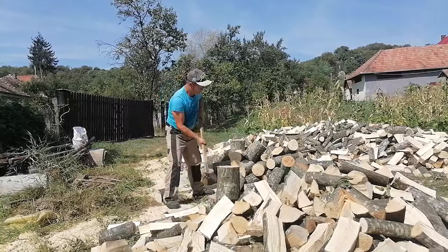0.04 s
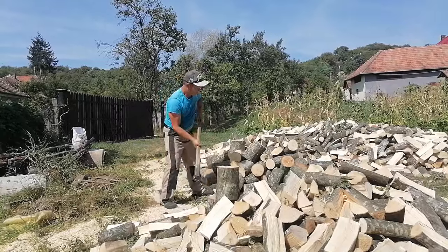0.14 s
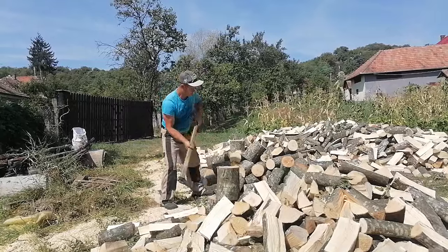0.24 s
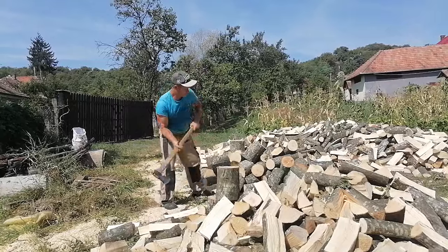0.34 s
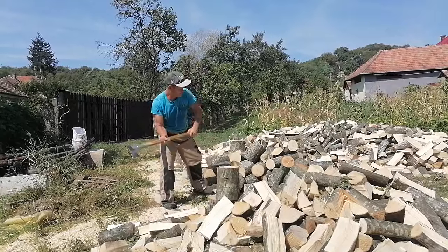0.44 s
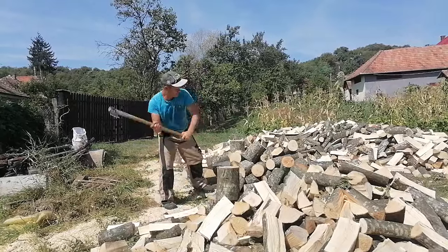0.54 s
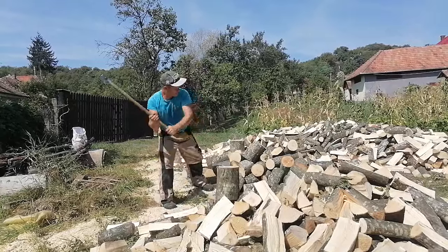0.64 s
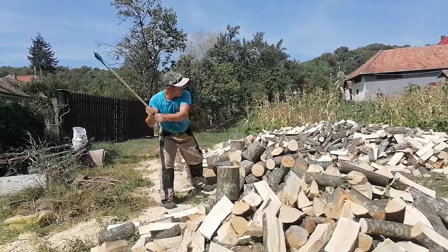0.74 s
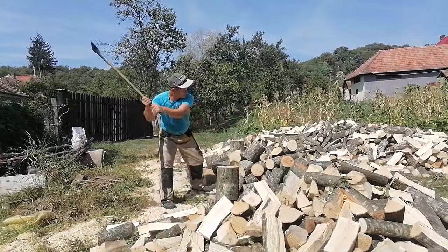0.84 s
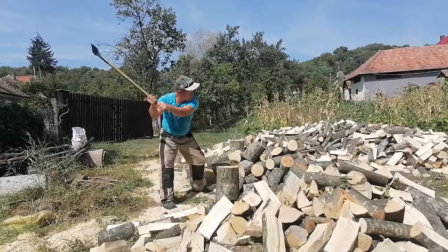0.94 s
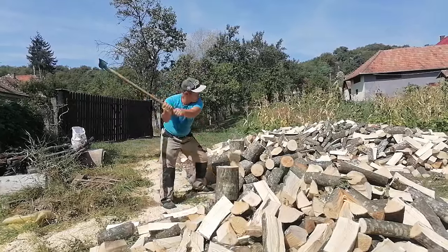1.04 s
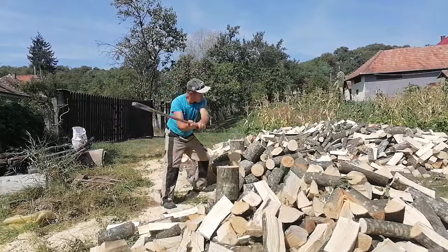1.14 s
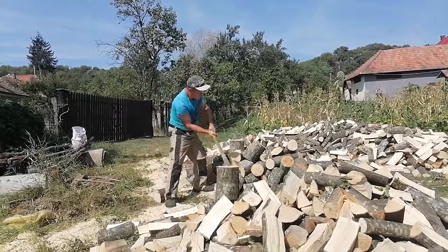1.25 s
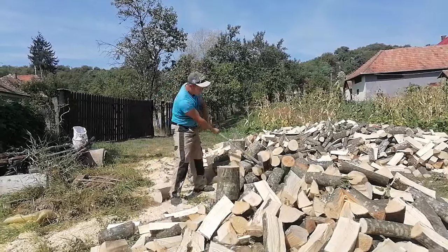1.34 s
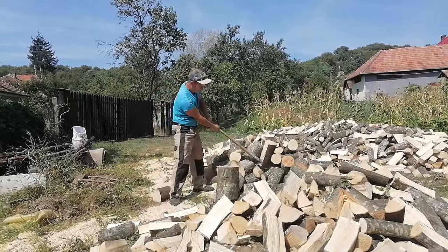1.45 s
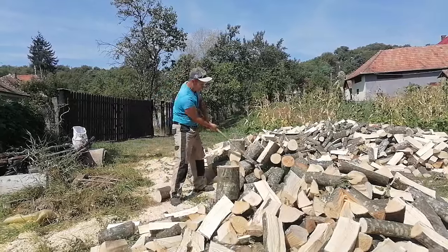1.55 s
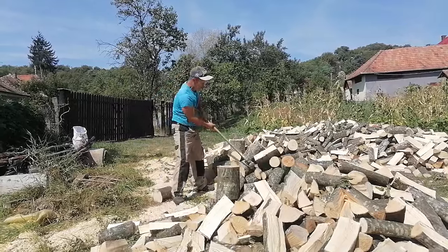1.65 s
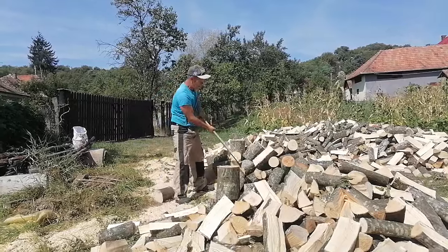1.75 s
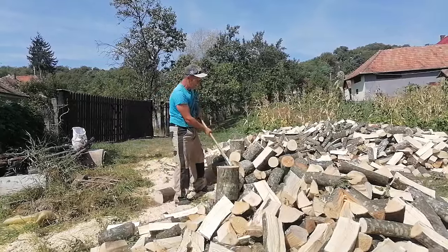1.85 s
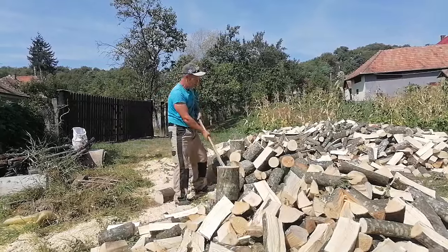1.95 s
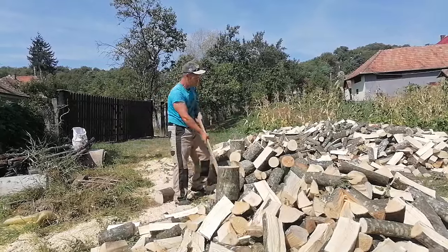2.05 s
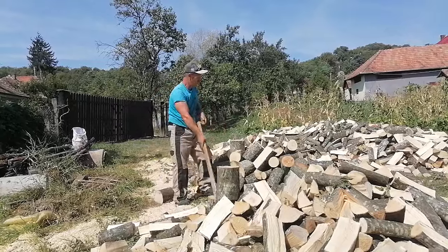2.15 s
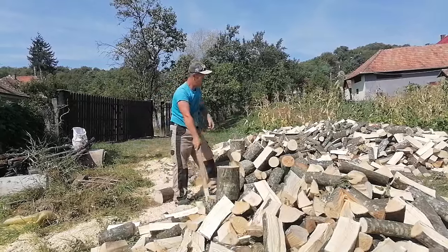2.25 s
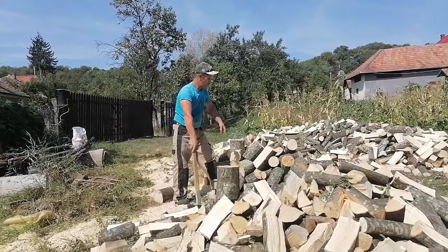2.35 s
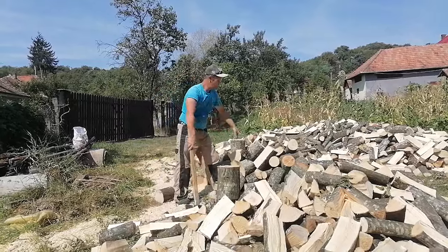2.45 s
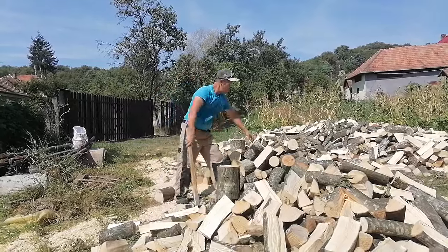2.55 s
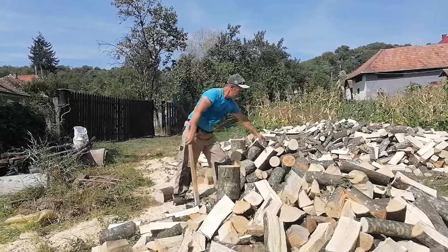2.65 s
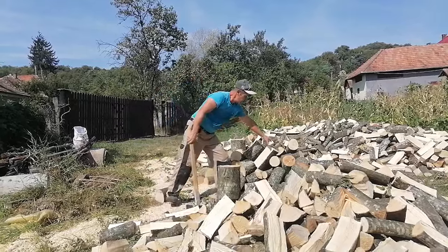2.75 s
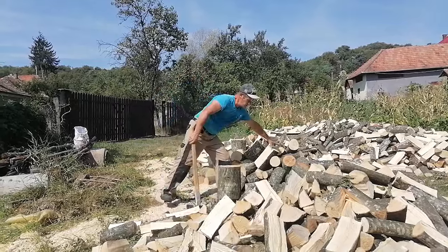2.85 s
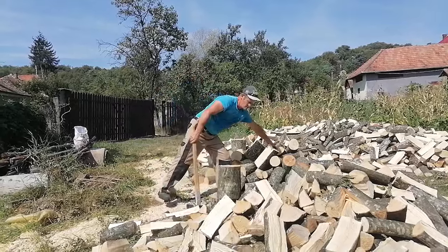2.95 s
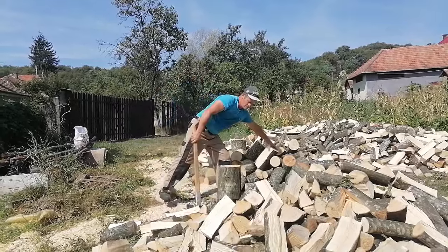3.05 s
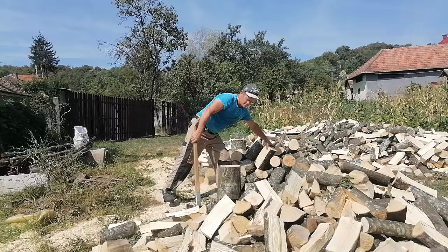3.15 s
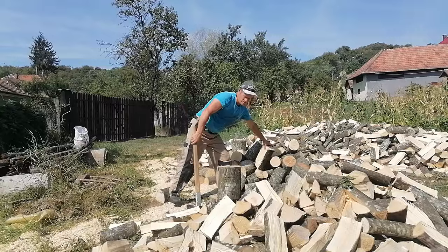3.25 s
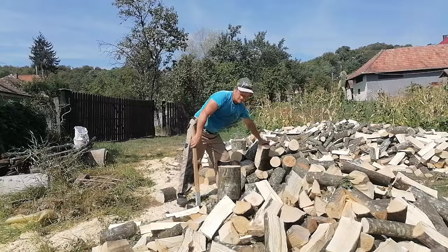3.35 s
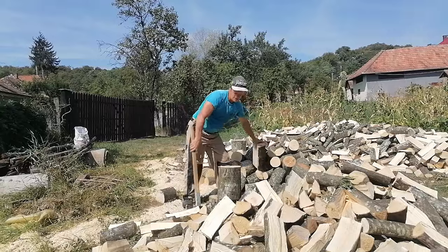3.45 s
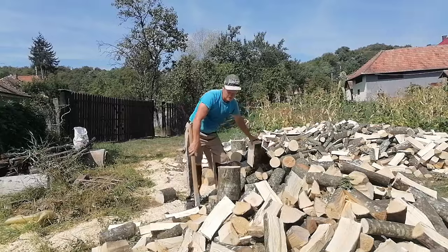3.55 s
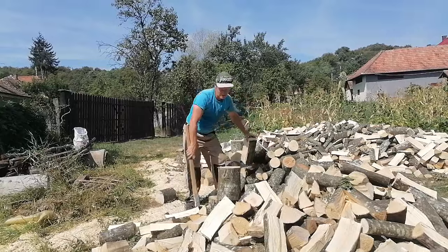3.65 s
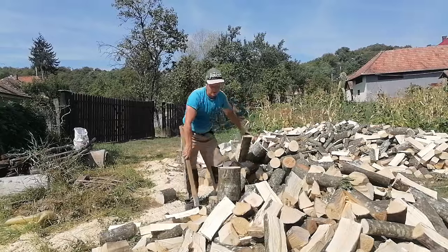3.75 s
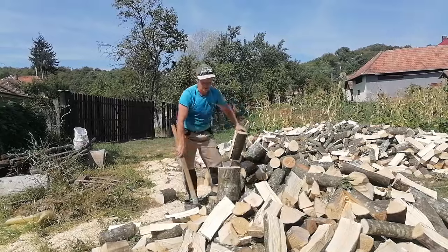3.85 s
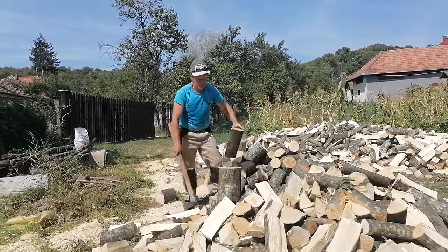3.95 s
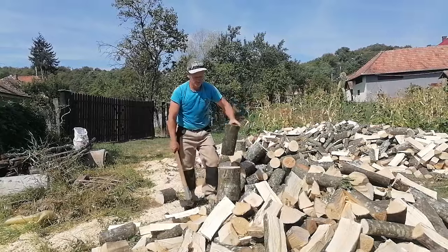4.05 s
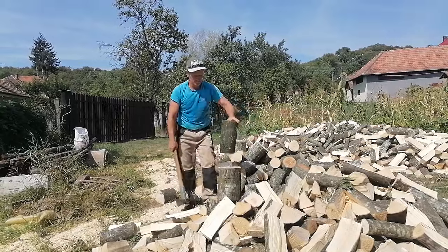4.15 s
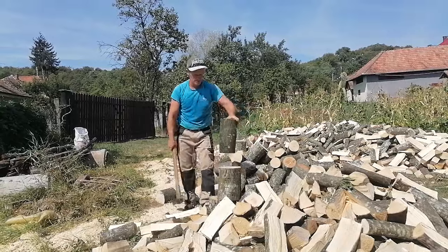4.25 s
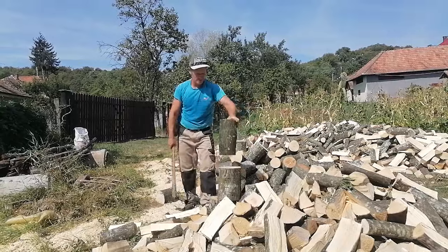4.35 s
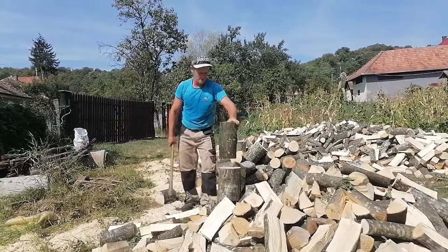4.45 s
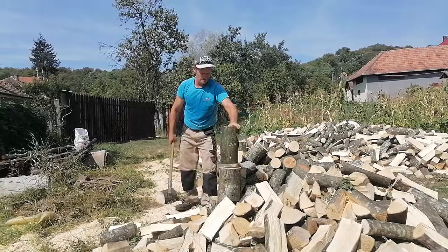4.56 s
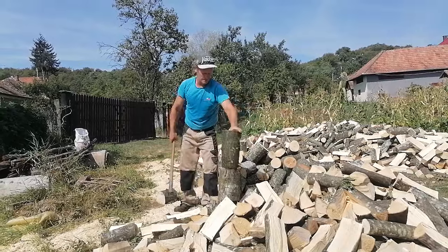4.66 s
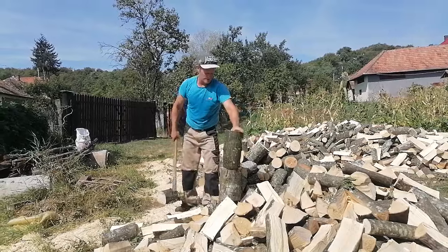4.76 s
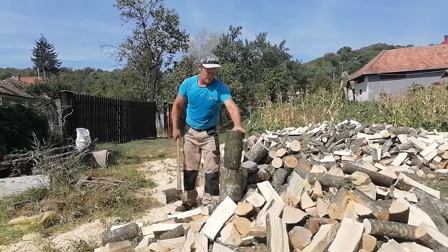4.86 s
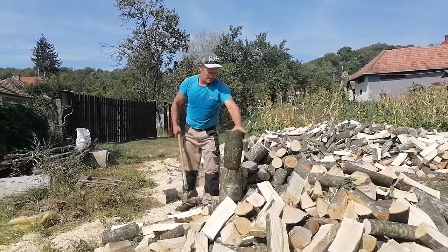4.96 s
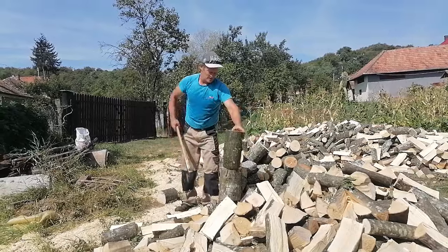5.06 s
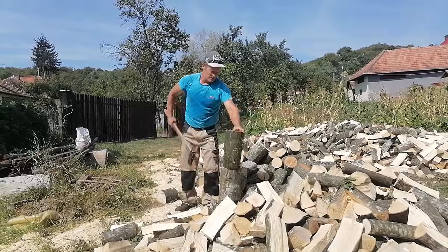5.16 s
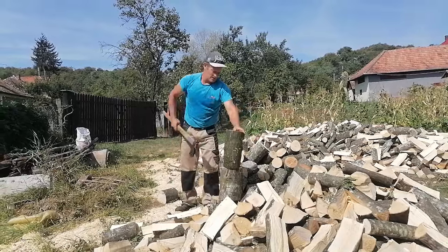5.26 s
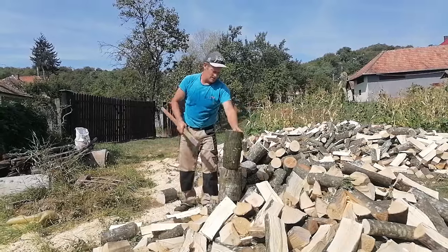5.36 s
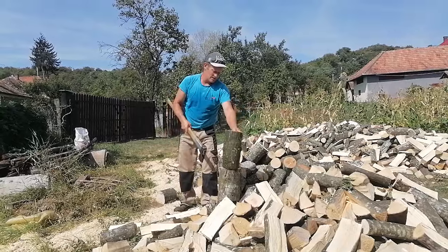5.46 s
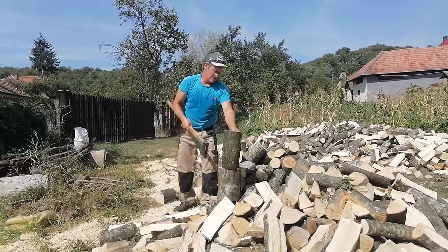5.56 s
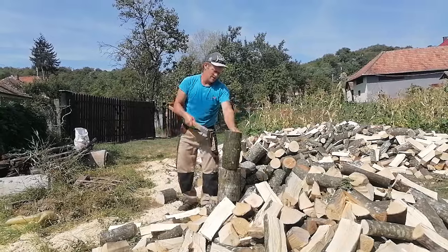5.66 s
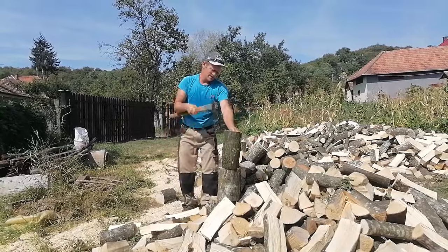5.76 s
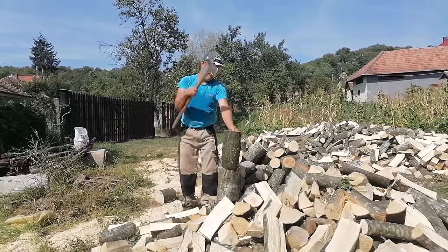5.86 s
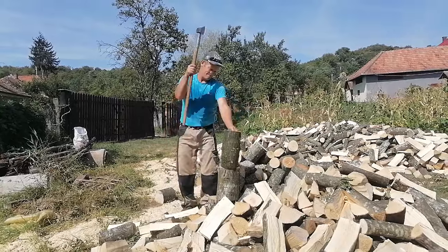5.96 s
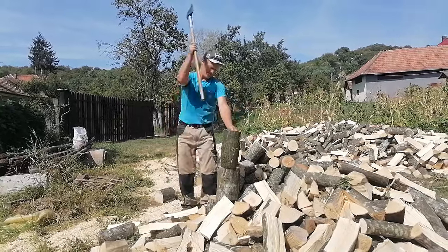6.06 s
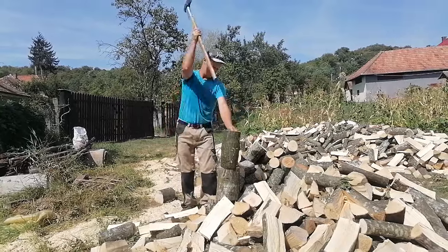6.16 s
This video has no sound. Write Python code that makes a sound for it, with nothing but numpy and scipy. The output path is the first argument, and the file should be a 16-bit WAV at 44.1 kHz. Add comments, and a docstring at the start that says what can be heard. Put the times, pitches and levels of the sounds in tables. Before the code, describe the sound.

A quiet rural yard with a low hush of light wind and foliage, and very faint, thin crickets coming and going. Clothes rustle softly and a palm slides along a handle at about 0.8 seconds. At 1.3 seconds an axe gives a short swish, and just before 1.5 it splits a log with a loud, sharp, splintering crack, by far the loudest sound, leaving a brief outdoor echo. The halves clatter into a woodpile until about 2 seconds, with a small bright tick and more rustling. Around 3 to 3.3 seconds the next log comes out of the pile with a few dull knocks and another tick. At 4.8 seconds it is set on the chopping block with a hollow clunk and rocks briefly. A soft hand slide follows at 5.5 seconds, and a faint, hoarse rooster calls far away near 6 seconds.

```python
"""A quiet rural yard: an axe swishes down and splits a log on a chopping block.
The wedge rings the log and tears its fibres; the crack scatters off woodpile, house and trees
while the halves tumble into the pile. The next log knocks out of the pile and is set on the block.
Clothes rustle, two short bright ticks sound, a palm slides on the handle and light air moves;
crickets and a rooster are heard far off."""
import sys
import numpy as np
from scipy import signal
from scipy.fft import rfft, irfft, next_fast_len
from scipy.io import wavfile

SR = 44100
rng = np.random.default_rng(int(sys.argv[2]) if len(sys.argv) > 2 else 0)


def put_to_file(sound):
    """Save the sound as 16-bit audio at rate SR, in the file named by the first command-line argument."""
    columns = np.atleast_2d(sound).T  # one column per channel
    safe = np.clip(columns, -1, 1)
    whole_steps = np.round(safe * 32767)
    wavfile.write(sys.argv[1], SR, whole_steps.astype(np.int16))


N = 274329
T = np.arange(N) / SR
FFT_SIZE = 2 * next_fast_len(N // 2 + 4096)
BIN_HZ = np.maximum(np.arange(FFT_SIZE // 2 + 1) * SR / FFT_SIZE, 1)


def from_db(db):
    """Decibels to gain."""
    return 10 ** (np.asarray(db) / 20)


def unit_rms(x):
    """Scale to unit power."""
    return x / np.sqrt(np.mean(x ** 2) + 1e-20)


def over_time(rows):
    """Curve columns at every sample."""
    time_s, *columns = np.transpose(rows)
    return [np.interp(T, time_s, column) for column in columns]


def over_hz(rows):
    """Spectrum columns at every bin."""
    freq_hz, *columns = np.transpose(rows)
    return [np.interp(np.log(BIN_HZ), np.log(freq_hz), column) for column in columns]


def panned(x, pan_db):
    """Level pan; positive is left."""
    return x * from_db([[pan_db / 2], [-pan_db / 2]])


def lowpass(x, cutoff_hz, order=1):
    """Butterworth low-pass."""
    sos = signal.butter(order, np.clip(cutoff_hz, 20, .45 * SR), fs=SR, output="sos")
    return signal.sosfilt(sos, x + 1e-18)


def event_window(start_s):
    """Slice and sample ages of the quarter second from start_s."""
    span = slice(int(start_s * SR), int(start_s * SR) + SR // 4)
    return span, T[span] - start_s


def swell(peak_s, attack_s, release_s):
    """Gaussian rise to 1 and fall."""
    return np.exp(-np.minimum(((T - peak_s) / np.where(T < peak_s, attack_s, release_s)) ** 2, 50))


def decay(age_s, t60_s, rise_s):
    """Exponential rise and decay from age 0."""
    age_s = np.maximum(age_s, 0)
    return (1 - np.exp(-age_s / rise_s)) * np.exp(-np.minimum(np.log(1000) * age_s / t60_s, 50))


def grain(depth_db, rate_hz):
    """Randomly flickering gain, unit power."""
    flicker = unit_rms(lowpass(rng.standard_normal(N), rate_hz, order=2))
    return unit_rms(from_db(depth_db * flicker))


def noise(spectrum_db):
    """Coloured noise, unit power."""
    return unit_rms(irfft(rfft(rng.standard_normal(FFT_SIZE)) * from_db(spectrum_db))[:N])


def narrow_band(pitch_hz, width_hz):
    """Noise band around a steady or gliding pitch."""
    in_phase, quadrature = unit_rms(lowpass(rng.standard_normal((2, N)), width_hz, order=2))
    phase = 2 * np.pi * np.cumsum(pitch_hz * np.ones(N)) / SR
    return in_phase * np.cos(phase) + quadrature * np.sin(phase)


def ring(modes, age_s, pitch_ratio=1):
    """Struck modes build within a fraction of a cycle; a log is too small to radiate deep bass."""
    pitch_hz, level_db, t60_s = np.transpose(modes)
    age_s = np.maximum(age_s, 0)[:, None]
    phase = 2 * np.pi * pitch_hz * pitch_ratio * age_s
    envelopes = decay(age_s, t60_s, rise_s=1 / (2 * np.pi * pitch_hz))
    body = (np.cos(phase) * envelopes) @ from_db(level_db)
    return signal.sosfilt(signal.butter(6, 90, "high", fs=SR, output="sos"), body)


# Diffuse field, left to right: freq_hz, coherence
COHERENCE = [(25, 0.1), (100, 0.7), (400, 0.5), (1000, 0.2), (2000, 0), (8000, 0.05)]


def diffuse(spectrum_db):
    """Stereo noise from all around: partly alike in the bass, unrelated in the treble."""
    coherence = np.clip(over_hz(COHERENCE)[0], 0, 1)
    mid, side = rfft(rng.standard_normal((2, FFT_SIZE)))
    stereo = np.sqrt(1 + coherence) * mid + np.sqrt(1 - coherence) * side * [[1], [-1]]
    return unit_rms(irfft(stereo * from_db(spectrum_db))[:, :N])


# Outdoor air: time_s, hush_db, wind_db
AIR_LEVELS = [(0.0, -71, -69.5), (.57, -70.5, -70), (.85, -70, -72.5), (1.14, -71, -69.5), (1.7, -70, -73),
              (2.15, -74.5, -77), (3.3, -73, -73.5), (4.05, -74, -75.5), (4.9, -76.5, -73.5),
              (6.22, -74.5, -72.5)]
# Foliage hush: freq_hz, gain_db
FOLIAGE_SPECTRUM = [(40, -4.5), (150, 0), (300, -4), (700, -5), (1150, -8), (1550, -9), (2800, -6),
                    (4000, -11), (5200, -15), (7000, -19.5), (10000, -23), (15000, -17)]
# Wind rumble: freq_hz, gain_db
RUMBLE_SPECTRUM = [(12, 0), (28, 0.5), (42, -6.5), (65, -8), (110, -15), (250, -22.5), (800, -52.5)]


def air(hush_gain_db=5, wind_gain_db=3.5):
    """Far hush of foliage over a low rumble of wind."""
    hush_db, wind_db = over_time(AIR_LEVELS)
    hush = from_db(hush_gain_db + hush_db) * diffuse(over_hz(FOLIAGE_SPECTRUM)[0])
    wind = from_db(wind_gain_db + wind_db) * diffuse(over_hz(RUMBLE_SPECTRUM)[0])
    return panned(hush, pan_db=-2.5) + panned(wind, pan_db=-3.5)


# Spells of cricket song: peak_s, length_s, level_db
CRICKET_SPELLS = [(.75, .9, -81), (2.65, .4, -82), (3.9, .6, -80), (4.55, .52, -85)]


def crickets():
    """Far crickets: a thin high tone that comes and goes."""
    singing = sum(from_db(level_db) * swell(peak_s, length_s / 2, length_s / 2)
                  for peak_s, length_s, level_db in CRICKET_SPELLS)
    return panned(singing * narrow_band(pitch_hz=2850, width_hz=26), pan_db=-8.0)


# Bands of the call: pitch_hz, width_hz, peak_s, attack_s, release_s, level_db
ROOSTER_BANDS = [(760, 70, 5.98, 0.13, 0.078, -72.5), (627, 86, 5.92, 0.35, 0.14, -78),
                 (1530, 73, 5.76, 0.2, 0.27, -79)]


def rooster():
    """A faint hoarse call, blurred by distance into narrow bands."""
    call = sum(from_db(level_db) * swell(peak_s, attack_s, release_s) * narrow_band(pitch_hz, width_hz)
               for pitch_hz, width_hz, peak_s, attack_s, release_s, level_db in ROOSTER_BANDS)
    return panned(call, pan_db=-2.0)


# Clothing rustles and two short bright ticks: peak_s, length_s, level_db
RUSTLES_AND_TICKS = [(.1, 1, -77), (0.804, 0.19, -65.5), (1.105, 0.29, -73), (1.494, 0.33, -67.5),
                     (1.811, 0.27, -67.5), (1.889, 0.011, -63.5), (2.125, 0.13, -72.5), (2.76, 0.28, -71.5),
                     (3.059, 0.29, -69), (3.193, .025, -68), (4.081, 0.068, -79), (5.379, .25, -84.5)]
# Colour of the rustles and ticks: freq_hz, gain_db
RUSTLE_TICK_SPECTRUM = [(500, -14), (1600, -9.5), (2600, -8), (4500, 4), (7000, 1), (10000, 2.5),
                        (12000, 3), (15500, -12.5)]
# Hand slides along the handle: peak_s, level_db
PALM_SLIDES = [(.83, -66), (5.48, -70.5)]
# Palm friction: freq_hz, gain_db
PALM_SPECTRUM = [(3000, -33.5), (7500, -7), (9000, -5), (10500, 2), (11800, -1), (13500, -7.5),
                 (15500, -19)]


def rustles_and_ticks(rest_db=-86, gain_db=-5.5):
    """Grainy clothing rustles and two short bright ticks; the palm hisses on the smooth handle."""
    swells = from_db(rest_db) + sum(from_db(level_db) * swell(peak_s, length_s / 2, length_s / 2)
                                    for peak_s, length_s, level_db in RUSTLES_AND_TICKS)
    sliding = sum(from_db(level_db) * swell(peak_s, attack_s=.094, release_s=.043)
                  for peak_s, level_db in PALM_SLIDES)
    grains = swells * grain(depth_db=3.0, rate_hz=200) * diffuse(over_hz(RUSTLE_TICK_SPECTRUM)[0])
    palm = sliding * diffuse(over_hz(PALM_SPECTRUM)[0])
    return from_db(gain_db) * panned(grains + palm, pan_db=2.0)


def scatter(spectrum_db, delay_s, t60_s, rise_s):
    """Uneven reflections from one part of the yard: 1 s response, unit energy a side."""
    echoes = diffuse(spectrum_db) * grain(depth_db=5.5, rate_hz=400) * decay(T - delay_s, t60_s, rise_s)
    return unit_rms(echoes[:, :SR]) / np.sqrt(SR)


# Yard reflections: freq_hz, near_db, far_db
YARD_SPECTRA = [(60, -22, -3), (200, -6, 3), (490, -2.5, -14), (750, -6.5, 3), (1000, -3.5, -10),
                (1250, -6, -19), (1700, -2, -1), (2100, 5, 8.5), (2800, 2, 12.5), (4000, 2, -6),
                (5200, -.5, -8), (6840, -5.5, -15), (9980, -4.5, -20), (14890, 0, -23)]


def yard_echo(x):
    """Woodpile and fence scatter a blow at once; house and trees answer later and faintly."""
    near_db, far_db = over_hz(YARD_SPECTRA)
    woodpile = from_db(-12) * scatter(near_db, delay_s=.0046, t60_s=.39, rise_s=.0019)
    house = from_db(-45) * scatter(far_db, delay_s=.165, t60_s=.24, rise_s=.013)
    trees = from_db(-40.5) * scatter(far_db, delay_s=.333, t60_s=.65, rise_s=.058)
    return panned(signal.fftconvolve(x, woodpile + house + trees, axes=1)[:, :N], pan_db=-4.5)


# Crushed bark: freq_hz, gain_db
BARK_SPECTRUM = [(200, -16.5), (1500, -13.5), (3000, -2), (5000, -6.5), (7300, 11), (10000, 1.5),
                 (15000, 3)]


def bark_crush():
    """Gritty noise of bark crushed in a contact."""
    return noise(over_hz(BARK_SPECTRUM)[0]) * grain(depth_db=2.0, rate_hz=900)


# Splinters, halves and logs hitting wood: start_s, level_db, hardness_hz, pitch_ratio
LANDINGS = [(1.498, -48.5, 2600, 1.2), (1.5215, -49.5, 2200, 1.4), (1.5359, -37, 1200, 1),
            (1.5402, -33.5, 2400, 1.01), (1.5515, -36, 1300, .98), (1.5565, -35.5, 1400, 1),
            (1.5795, -39, 1500, 1.04), (1.5905, -36, 1000, 1.06), (1.608, -45, 650, 1),
            (1.618, -46, 750, 1.08), (1.7157, -47.5, 2800, 1.12), (1.7301, -56, 1502, 1.04),
            (1.8132, -41.5, 800, 1.11), (1.9457, -49, 616, 0.995), (3.0350, -44.5, 278, 1.15),
            (3.187, -36.5, 260.4, 0.91), (3.272, -56, 300, 0.94), (4.824, -50, 400, 0.89),
            (4.857, -45.5, 320, 0.89), (4.875, -51, 453, 1.05)]


def contacts(count=3, gap_s=.0175, loss_db=11, softening=.8, spread=.12):
    """A piece lands and rocks: each rebound is weaker, softer and uneven in time and pitch."""
    jitter = np.exp(spread * rng.standard_normal((len(LANDINGS), count, 2)))
    for (start_s, level_db, hardness_hz, pitch_ratio), draws in zip(LANDINGS, jitter):
        for bounce, (gap_ratio, detune) in enumerate(draws):
            yield (start_s + bounce * gap_s * gap_ratio,
                   level_db - bounce * loss_db,
                   hardness_hz * softening ** bounce,
                   pitch_ratio * (detune if bounce else 1))


# Knocked log: pitch_hz, level_db, t60_s
PIECE_MODES = [(108, -13, .07), (152, -10, .05), (205, -6, .045), (260, -9, .04), (495, -7, 0.047),
               (590, -9.5, .028), (697, -10.5, 0.046), (810.6, -10, 0.032), (1090, -14, .035),
               (1384, -11, .06), (1600, -15, .04), (2550, -19.5, .05), (3040, -20, .04)]


def log_knocks(bark_db=-15):
    """Each contact rings a log, higher for a smaller piece, and crushes a little bark."""
    out = np.zeros(N)
    bark = bark_crush()
    for start_s, level_db, hardness_hz, pitch_ratio in contacts():
        span, age_s = event_window(start_s)
        body = lowpass(ring(PIECE_MODES, age_s, pitch_ratio), hardness_hz, order=2)
        tick = from_db(bark_db) * bark[span] * decay(age_s, t60_s=.033, rise_s=.0002)
        out[span] += from_db(level_db) * (body + lowpass(tick, 2 * hardness_hz))
    return panned(out, pan_db=-2.0)


# Next log set on the block: start_s, level_db, hardness_hz
BLOCK_CONTACTS = [(4.7742, -28.5, 1280), (4.7921, -39.5, 900)]
# Block with the log on it: pitch_hz, level_db, t60_s
LOADED_BLOCK_MODES = [(114.1, -12.5, 0.051), (148, -5, 0.055), (195, -4, 0.057), (298, -5.5, 0.065),
                      (528, -3.5, 0.028), (595, -6, 0.026), (723, -11.5, .04), (823, -20, 0.044),
                      (1204, -14, 0.065), (1470, -15, 0.035), (1586, -11, 0.023), (1814, -27, .06),
                      (2240, -24.5, 0.099), (2546, -29, .09), (3060, -11.5, 0.039)]


def log_on_block(bark_db=-5.5, bark_delay_s=.0019, notch_hz=1040, notch_q=3.0):
    """The log lands and rocks once; bark cracks; log and block ring, hollow above the low modes."""
    out = np.zeros(N)
    bark = bark_crush()
    for start_s, level_db, hardness_hz in BLOCK_CONTACTS:
        span, age_s = event_window(start_s)
        body = lowpass(ring(LOADED_BLOCK_MODES, age_s), hardness_hz, order=2)
        tick = from_db(bark_db) * bark[span] * decay(age_s - bark_delay_s, t60_s=.035, rise_s=.00018)
        out[span] += from_db(level_db) * (body + lowpass(tick, 2 * hardness_hz))
    hollow = signal.lfilter(*signal.iirnotch(notch_hz, notch_q, fs=SR), out + 1e-18)
    return panned(hollow, pan_db=1.3)


# Edge tones: slow_hz, fast_hz, peak_s, half_length_s, level_db
SWING_TONES = [(2080, 2650, 1.319, .021, -60.5), (2500, 3350, 1.338, .013, -64),
               (3095, 4456, 1.334, .019, -65.5)]


def axe_swish(mid_climb_s=1.324, climb_s=.014):
    """Airy edge tones, shed by head and handle, rise with the speed of the swing."""
    speed = (1 + np.tanh((T - mid_climb_s) / climb_s)) / 2
    out = np.zeros(N)
    for slow_hz, fast_hz, peak_s, half_length_s, level_db in SWING_TONES:
        tone = narrow_band(slow_hz + (fast_hz - slow_hz) * speed, width_hz=170)
        out += from_db(level_db) * swell(peak_s, half_length_s, half_length_s) * tone
    return out


# Bursts of tearing grain: start_s, level_db
TEAR_BURSTS = [(1.4676, -33), (1.4693, -17.5), (1.4715, -15), (1.475, -32), (1.4805, -26.5), (1.4845, -29),
               (1.4915, -37)]
# Tearing fibres: freq_hz, gain_db
FIBRE_SPECTRUM = [(50, -40), (110, -15), (250, -9), (380, -15), (780, 2.5), (1050, 2), (1450, -1),
                  (1760, -15), (2200, -10.5), (3000, 0), (4000, -11), (5000, -10), (6400, -1), (7400, -7),
                  (8800, 0), (10000, -2.5), (15000, -8.5)]


def fibre_tears(bite_s, bite_t60_s=.008, t60_doubling_s=.0073, bite_cutoff_hz=14050, halving_s=.011):
    """Fibres part in gritty bursts, longer and duller the deeper the split runs."""
    out = np.zeros(N)
    fibres = noise(over_hz(FIBRE_SPECTRUM)[0]) * grain(depth_db=2.2, rate_hz=900)
    for start_s, level_db in TEAR_BURSTS:
        span, age_s = event_window(start_s)
        since_bite_s = start_s - bite_s
        t60_s = bite_t60_s * 2 ** (since_bite_s / t60_doubling_s)
        cutoff_hz = bite_cutoff_hz / 2 ** (since_bite_s / halving_s)
        burst = fibres[span] * decay(age_s, t60_s, rise_s=.0003)
        out[span] += from_db(level_db) * lowpass(burst, cutoff_hz)
    return out


# Log as the blade bites: pitch_hz, level_db, t60_s
WHOLE_LOG_MODES = [(111.5, -23.5, .05), (200, -17.5, .036), (279.7, -25, .06), (580, -22, .028),
                   (738, -17, .033), (796, -17, .025), (1070, -21, 0.022), (1210, -14.5, .017),
                   (1320, -16.5, .022), (1515, -16.5, .02)]
# Steel head: pitch_hz, level_db, t60_s
AXE_HEAD_MODES = [(2558, -29, .022), (3020, -28, 0.019), (4870, -34, 0.019), (6400, -29, .012)]
# Freed halves: pitch_hz, level_db, t60_s
HALF_LOG_MODES = [(513, -36, 0.0598), (735, -33, .05), (856, -25, 0.054), (973.6, -29.5, 0.051),
                  (1070, -31.5, .05), (1290, -29.5, 0.046), (1357, -30, .05), (1482, -35.5, .07),
                  (2000, -43, .15), (2290, -43.5, .15), (2410, -44.5, .08), (2545, -44, .16),
                  (2670, -46.5, .12), (3057, -45.5, 0.095), (4460, -48, 0.068)]


def axe_blow(bite_s=1.4697, split_s=1.4797, wedge_hz=1680):
    """The wedge rings the log, the head pings until gripped, fibres tear, the halves spring free."""
    out = fibre_tears(bite_s)
    span, age_s = event_window(bite_s)
    out[span] -= lowpass(ring(WHOLE_LOG_MODES, age_s), wedge_hz, order=6) + ring(AXE_HEAD_MODES, age_s)
    span, age_s = event_window(split_s)
    out[span] += ring(HALF_LOG_MODES, age_s)
    return panned(out, pan_db=0.0)


def scene(knock_send_db=-7.0):
    """Stereo sum; knocks low in the pile reach the yard less than the blow does."""
    blow = axe_blow()
    knocks = log_knocks() + log_on_block()
    echo = yard_echo(blow + from_db(knock_send_db) * knocks)
    return blow + knocks + echo + axe_swish() + rustles_and_ticks() + crickets() + rooster() + air()


# Cavity resonances of the two microphone ports: freq_hz, left_db, right_db
PORT_RESPONSE = [(29.45, 2, 2.5), (593, 1, 1.5), (1100, -1.5, 1.5), (1456.5, -1.5, 5.5), (2078, -6, 5.5),
                 (2970, -3, 5.5), (3970, -7.5, 2), (5100, -0.5, 8.5), (6200, 1.5, -1.5), (8000, -.5, -7),
                 (9360, 8.5, -10.5), (9930, 14, -11), (10570, 5.5, -9), (11000, 1.5, -6), (13400, 0, -5),
                 (15440, -4, -1.5)]
# Lag of waves bending round the body to the right port: freq_hz, lag_ms
RIGHT_PORT_LAG = [(300, 0.3), (800, .22), (1500, 0.18), (2100, .11), (3000, 0.011), (8000, .02)]


def record(dry, hiss_db=-82.5, cutoff_hz=15800):
    """Each port colours its channel, the right one lags; the electronics hiss, the top is cut."""
    cepstrum = irfft(np.log(from_db(over_hz(PORT_RESPONSE))))
    cepstrum[:, 1:FFT_SIZE // 2] *= 2   # fold to minimum phase
    cepstrum[:, FFT_SIZE // 2 + 1:] = 0
    lag_s = np.outer([0, 1], over_hz(RIGHT_PORT_LAG)[0] / 1000)
    response = np.exp(rfft(cepstrum) - 2j * np.pi * BIN_HZ * lag_s)
    coloured = irfft(rfft(dry, FFT_SIZE) * response)[:, :N]
    hiss = from_db(hiss_db) * rng.standard_normal((2, N))
    return signal.sosfilt(signal.ellip(10, .2, 80, cutoff_hz, fs=SR, output="sos"), coloured + hiss)


dry = scene()
out = record(dry)
put_to_file(out)
```